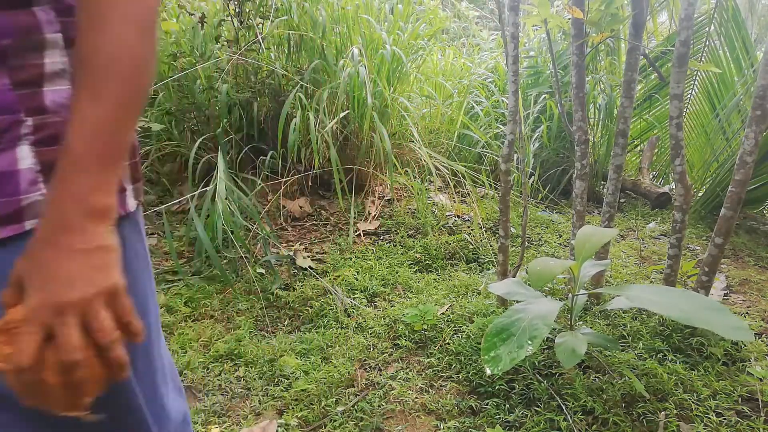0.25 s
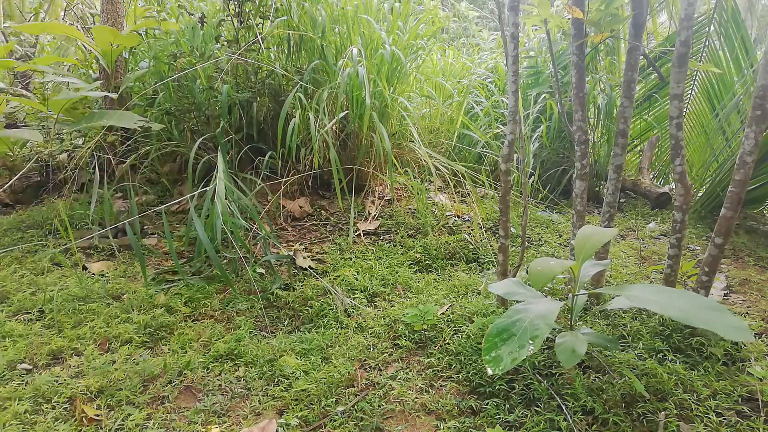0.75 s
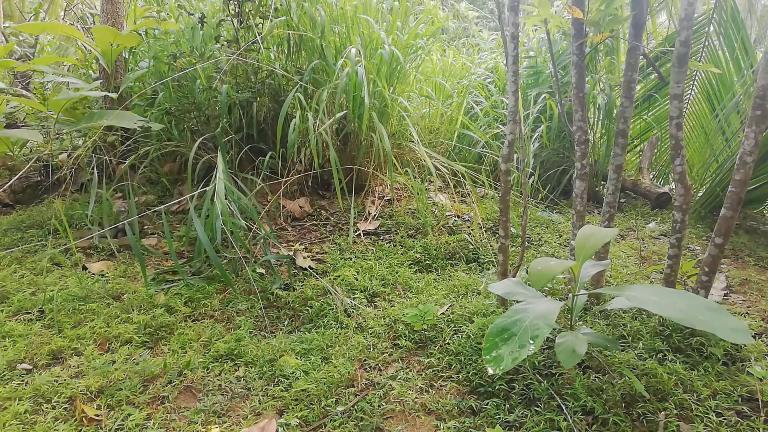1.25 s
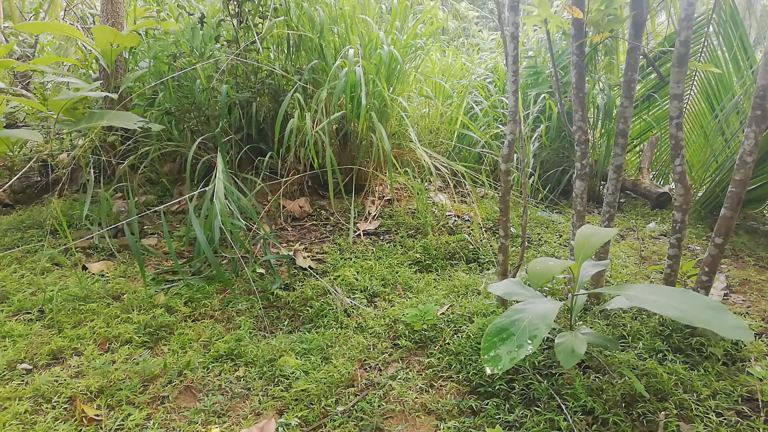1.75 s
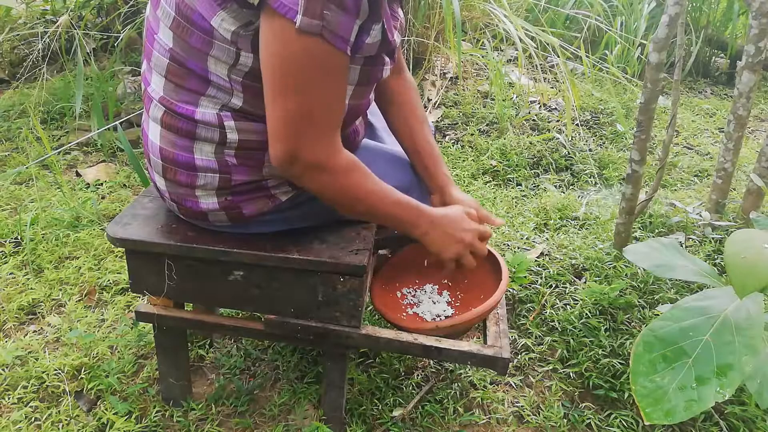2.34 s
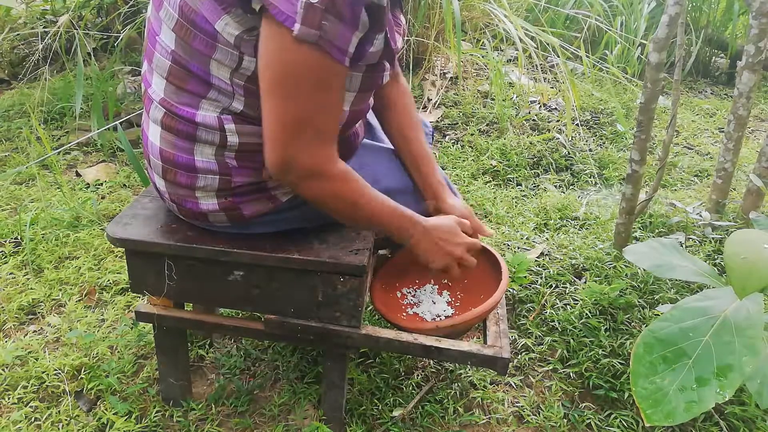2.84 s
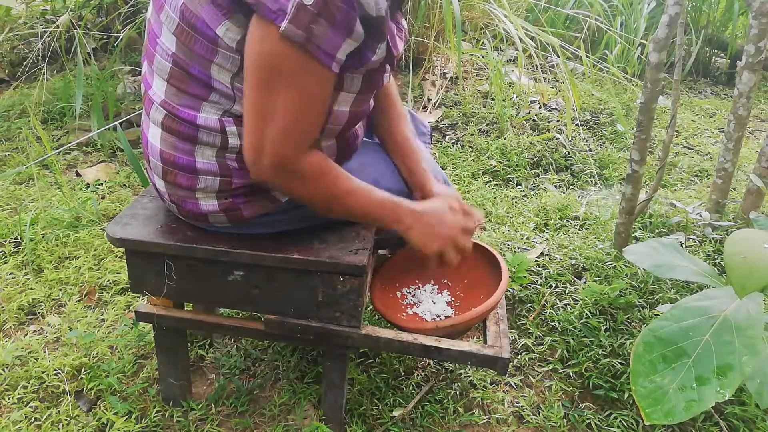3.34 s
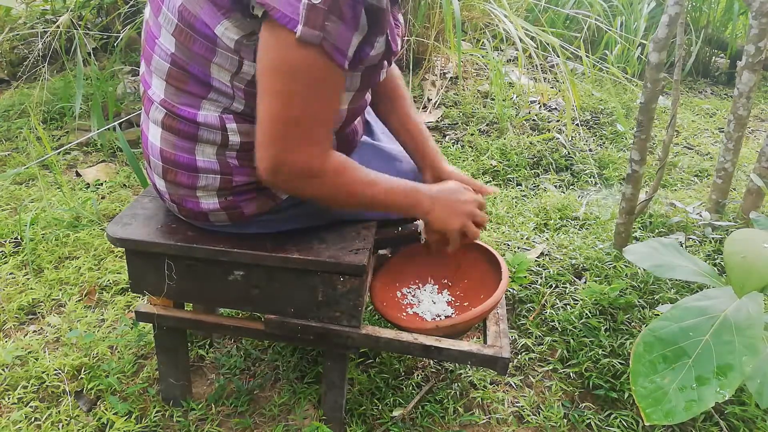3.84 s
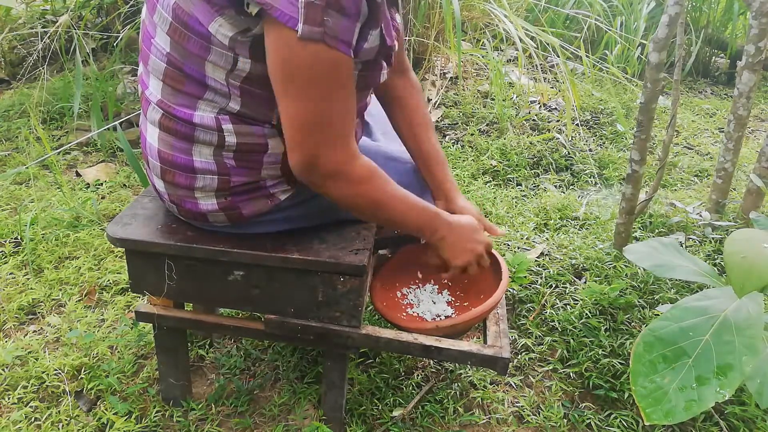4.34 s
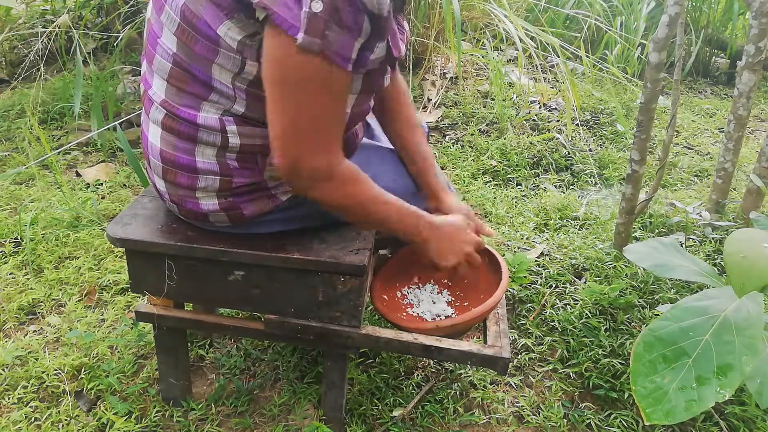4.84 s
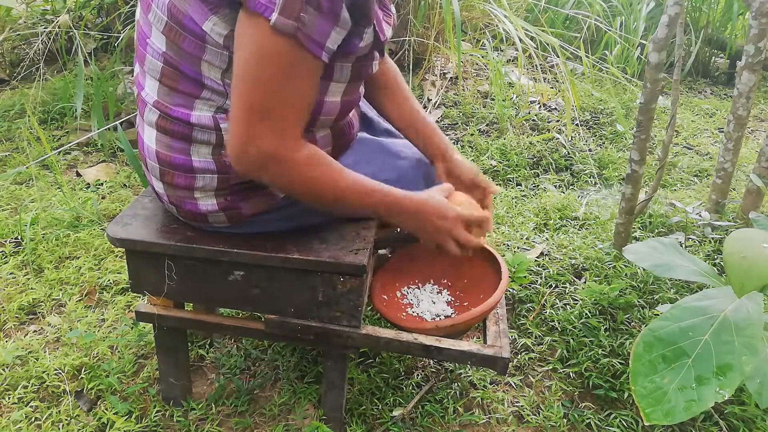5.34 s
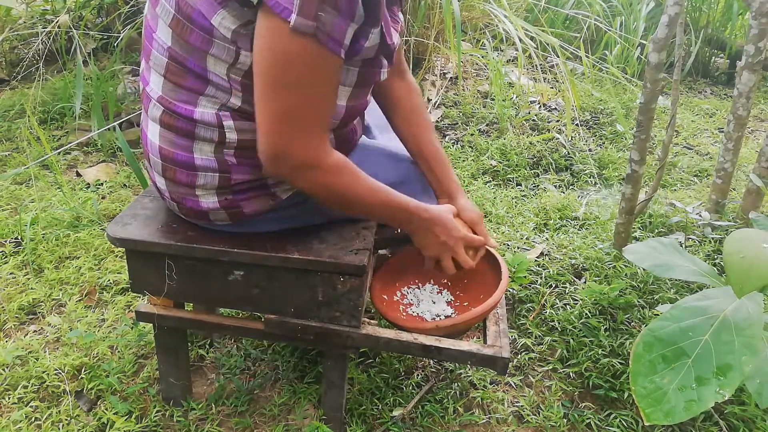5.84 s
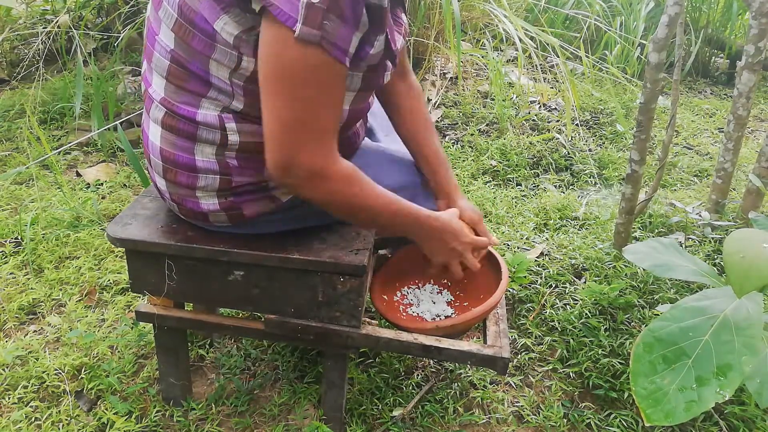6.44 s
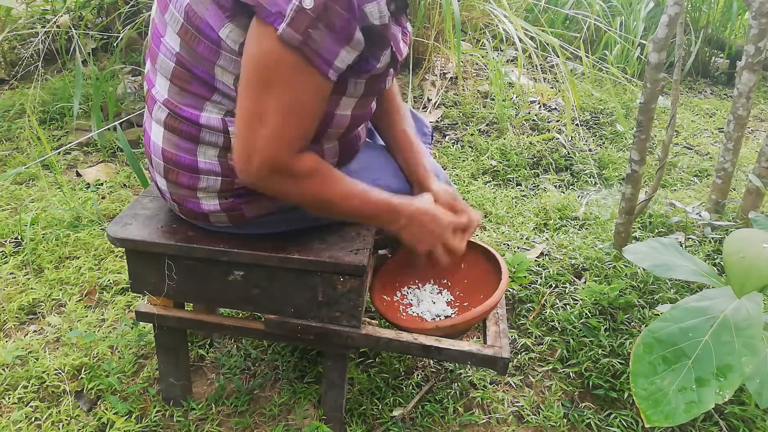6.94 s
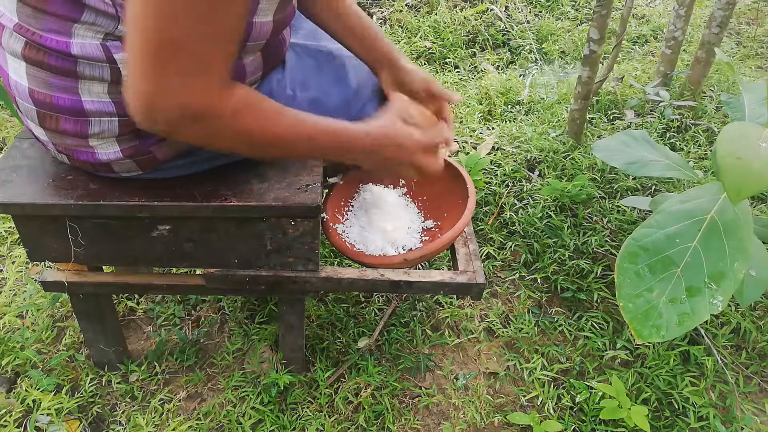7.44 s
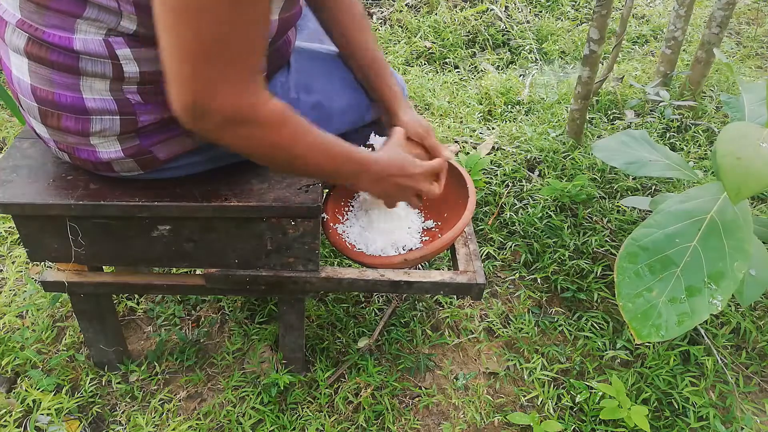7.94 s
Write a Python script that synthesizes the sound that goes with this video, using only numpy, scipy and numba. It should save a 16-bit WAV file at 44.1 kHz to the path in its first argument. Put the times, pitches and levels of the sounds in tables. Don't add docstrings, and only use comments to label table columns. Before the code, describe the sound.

From 0 to 2 s a quiet garden: low far traffic hum, thin leaf hiss, and small crisp grass rustles, a sharp step at the start and another near 0.9 s, a slower one at 1.2 s. A tiny silence at 1.97 s, then the work begins. From 2.2 to 4.9 s a coconut half is scraped on a toothed blade in rough, fibrous rasps every 0.3 s, each joined by a hollow wooden knock and brief stool groan, knocks growing harder towards 4.8 s. A pause with light shell taps follows; at 5.5 s strokes resume, with scratchy catches, softer knocks at first, strong again by 6.4-7.0 s. Another pause, a cut near 7.4 s, then three softer, hissier strokes at 7.6, 7.9 and 8.2 s, the last with a loud clack. Faint thin bird whistles pass throughout the work. Dry outdoor stereo, about two metres away.

```python
import sys
import numpy as np
from scipy import signal
from scipy.fft import rfft, irfft
from scipy.io import wavfile
from scipy.ndimage import uniform_filter1d
from numba import njit

SR = 44100
rng = np.random.default_rng(int(sys.argv[2]) if len(sys.argv) > 2 else 0)


def generate_wav(sig):
    pcm = np.round(np.clip(np.atleast_2d(sig).T, -1, 1) * 32767).astype(np.int16)
    wavfile.write(sys.argv[1], SR, pcm)


def elevation(decibels):
    levels = np.asarray(decibels, float)
    return 10 ** (levels / 20)


N = 361619
T = np.arange(N) / SR


def level(x, db):
    return x * elevation(db) / np.sqrt(np.mean(x ** 2))


def over_hz(table):
    hz, value = np.transpose(table)
    bins_hz = np.arange(N // 2 + 1) * SR / N
    return np.interp(np.log(bins_hz + 1), np.log(hz), value)


def colour(x, table):
    return irfft(rfft(x) * elevation(over_hz(table)), N)


def filtered(x, order, hz, kind):
    return signal.sosfilt(signal.butter(order, hz, kind, fs=SR, output="sos"), x)


@njit
def ring(x, pole):
    y, z = np.empty(len(x)), 0j
    for i in range(len(x)):
        z = z * pole + x[i]
        y[i] = z.imag
    return y


def body(x, modes):
    out = np.zeros(N)
    for hz, db, t60 in modes:
        pole = np.exp((2j * np.pi * hz - np.log(1000) / t60) / SR)
        out += elevation(db) * ring(x + 1e-18, pole)
    return out


def walk(rate):
    k = int(SR / rate)
    held = np.repeat(rng.standard_normal(N // k + 1), k)
    return 0.96 * uniform_filter1d(held, k)[:N]


def blows(times, db, contact_s):
    x = np.zeros(N)
    x[np.minimum((np.asarray(times) * SR).astype(int), N - 1)] = elevation(db)
    push = np.hanning(int(contact_s * SR) + 3)
    return np.convolve(x, push / push.sum())[:N]


def snaps(per_s, spread_db):
    broken = rng.random(N) < per_s / SR
    strength = rng.standard_normal(N) * elevation(spread_db * rng.exponential(size=N))
    return level(broken * strength, 0)


def ports(a, b, like, pan, lead=0):
    c = np.clip(over_hz(like), -1, 1)
    common = np.sqrt((1 + c) / 2) * rfft(a)
    other = np.sqrt((1 - c) / 2) * rfft(b)
    tilt = elevation(over_hz(pan) / 2) * np.exp(.5j * lead)
    return np.array([irfft((common + other) * tilt, N), irfft((common - other) / tilt, N)])


# t/s, level/dB, swell/s, fade/s
RUSTLE = [
    (0.025, -55, 0.0043, 0.0099),
    (.25, -68, .06, .06),
    (.6, -66, .06, .02),
    (.864, -68, .02, .03),
    (.93, -51, .004, 0.019),
    (1.136, -64, .005, .015),
    (1.21, -59.5, .03, 0.045),
    (1.41, -72, .05, .02),
]


def rustling():
    out = np.zeros(N)
    for s, db, swell, fade in RUSTLE:
        out += elevation(db) * np.exp((T - s).clip(None, 0) / swell - (T - s).clip(0) / fade)
    return out


# f/Hz, level/dB per Hz
GARDEN = [(12, -24), (20, -3.5), (53, 1), (88, 2), (158, -6.5), (241, -19), (270, -20), (923, -17.5),
          (1120, -19), (2140, -22), (2820, -23.5), (3530, -23.5), (8410, -29), (16000, -41)]
# t/s, leaf hiss level/dB, traffic hum level/dB
AIR = [
    (0, -65.5, -55),
    (1.2, -66.5, -54.5),
    (1.97, -66.5, -56.5),
    (2.0, -64.5, -54.5),
    (3.8, -62.5, -50.5),
    (5.4, -62, -53),
    (7.3, -63, -53.5),
    (7.4, -67, -51.5),
    (8.2, -66, -49.5),
]
# f/Hz, likeness
FAR_LIKE = [(60, 0.98), (130, 1), (290, 0.74), (640, -0.67), (1410, 0.00036), (3100, -0.012), (6820, -0.2),
            (15000, 0.27)]
# f/Hz, left minus right level/dB
FAR_PAN = [(300, 0), (700, 1.5), (1290, -.5), (2380, 0), (4400, 2), (8120, 3.5), (15000, -2)]


def garden():
    s, hiss_db, hum_db = np.transpose(AIR)
    rustle = rustling()
    pair = []
    for _ in range(2):
        air = colour(rng.standard_normal(N), GARDEN)
        hum = level(filtered(air, 3, 220, "low"), 0)
        hum = hum * elevation(np.interp(T, s, hum_db) - 4.5 + 3.5 * walk(3.89))
        hiss = level(filtered(air, 3, 220, "high"), 0)
        hiss = hiss * elevation(np.interp(T, s, hiss_db) + 7.5 + 0.42 * walk(20))
        blades = colour(snaps(3000, 1.9), [(2000, -2), (5000, 1), (8500, 8), (12000, -1), (15500, -4)])
        pair.append(hum + hiss + rustle * level(blades, 1.0))
    return ports(*pair, FAR_LIKE, FAR_PAN)


# bite t/s, rise/s, push/s, tearing level/dB, spray of shreds relative level/dB
STROKES = [(2.261, .091, 0.059, -41, -7), (2.532, .056, 0.063, -39, -6), (2.826, 0.085, 0.053, -40, -6),
           (3.093, 0.053, 0.066, -40, -6.5), (3.378, 0.063, 0.052, -39, -6),
           (3.651, 0.048, 0.087, -40, -6.5), (3.95, 0.051, 0.057, -38.5, -6), (4.24, 0.044, 0.06, -38, -8),
           (4.517, 0.037, 0.081, -41, -7), (4.797, 0.036, 0.087, -40, -7.5), (5.505, 0.11, .065, -40, -8),
           (5.811, 0.086, 0.034, -37.5, -6.5), (6.073, 0.038, 0.074, -39.5, -6.5),
           (6.375, .047, 0.069, -40, -6.5), (6.658, 0.029, 0.083, -38.5, -8),
           (6.978, 0.043, 0.092, -39.5, -8), (7.565, 0.069, 0.085, -43.5, -3),
           (7.859, 0.048, 0.086, -43, -2), (8.181, .081, .1, -42, -3.5)]
# t/s, level/dB, fade/dB per s
GROANS = [(2.24, -43, 30), (2.522, -41, 62), (2.8, -39.5, 58), (3.08, -39, 100), (3.36, -37, 100),
          (3.64, -34, 152), (3.931, -30.5, 200), (4.228, -42.5, 92), (4.503, -30.5, 220),
          (4.786, -29.5, 207), (5.49, -38, 30), (5.765, -42, 32), (6.079, -36.5, 120), (6.361, -34.5, 148),
          (6.651, -36, 150), (6.964, -33, 150), (7.565, -41.5, 50), (7.843, -41.5, 36), (8.158, -36.5, 30)]


def strokes():
    bite, rise, push, db, spray_db = np.transpose(STROKES)[:, :, None]
    load_s, load_db, fade = np.transpose(GROANS)[:, :, None]
    coarse = T[::32]
    t, loaded = coarse - bite, coarse - load_s
    lifted = (t - push).clip(0)
    rise_db, sag_db_per_s, lift_db_per_s = 25, 37, 328
    tear_db = db + 2 + rise_db * t.clip(None, 0) / rise
    tear = elevation(tear_db - sag_db_per_s * t.clip(0, push) - lift_db_per_s * lifted)
    onset_db_per_s, release_db_per_s = 950, 260
    load_db = load_db + onset_db_per_s * loaded.clip(None, 0) - fade * loaded.clip(0)
    load = elevation(load_db - release_db_per_s * lifted)
    groan = np.hypot(load, elevation(-14.5) * tear)
    return [np.interp(T, coarse, v.sum(axis=0)) for v in (tear, groan, tear * elevation(spray_db))]


# f/Hz, level/dB per Hz
TEAR = [(290, -35), (500, -4), (621, -23.5), (1190, -10.5), (1740, -10), (1930, -10), (2160, -10.5),
        (2390, -9), (4940, -10.5), (10800, -20.5), (16000, -26.5)]
# f/Hz, bandwidth/Hz, level/dB
BLADE = [(940, 90, 0), (1200, 70, -2), (1960, 100, -2), (2350, 150, -4), (3010, 120, -5), (3620, 180, -4),
         (4750, 220, -7), (5200, 150, -10), (6200, 250, -11)]
# f/Hz, level/dB, t60/s
STOOL = [(262, 0, .065), (200, -10, .06), (325, -4, .05), (405, -3, .055), (490, -2, .045), (585, -5, .04),
         (690, -9, .035)]
# f/Hz, level/dB, t60/s
TEETH = [(9260, -5, 0.016), (11320, 1, 0.0049), (12600, 8, 0.0024)]


def tearing(tear, groan, spray, judder, grips, patch_hz):
    force = snaps(11000, 0.69) * judder
    flesh = colour(force, TEAR)
    shell, blade, stool, teeth = np.zeros((4, N))
    for hz, g in zip(patch_hz, grips):
        shell += g * body(flesh, [(hz, 10 * np.log10(hz), 45 / (hz + 900))])
    for (hz, width, db), g in zip(BLADE, grips[::3]):
        blade += g ** .7 * body(force, [(hz, db + 10 * np.log10(width), 2.2 / width)])
    for mode, g in zip(STOOL, grips[1::3]):
        stool += g ** .5 * body(force, [mode])
    shreds = filtered(flesh, 4, 6800, "high")
    for mode, g in zip(TEETH, grips[2::3]):
        teeth += g ** 0.59 * body(shreds, [mode])
    rasp = level(shell, -1.5) + level(flesh - shreds, -13) + level(blade, -5)
    hiss = level(shreds * grips[5] ** .3, -1) + level(teeth, -13)
    return tear * level(rasp, 1.0) + groan * level(stool, 0.17) + spray * level(hiss, 0.054)


# t/s, crack level/dB, ring relative level/dB, ring f/Hz, thud relative level/dB
TAPS = [(2.7678, -37.5, 14, 730, -12), (3.69, -32, -13, 950, -7), (3.8886, -41, 0, 1480, 0),
        (4.1733, -48, 4, 1360, 8), (4.4598, -44.5, 4, 1320, -6), (4.745, -48, 2, 1300, 13),
        (5.0824, -41.5, 7, 1180, 16.5), (5.2312, -42, -10, 790, 14.5), (5.2432, -52, 8, 1510, 2),
        (5.4273, -33.5, 19.5, 1190, 11), (5.7094, -47, 6, 930, 12), (6.309, -49.5, 4, 1200, 10),
        (6.364, -32, 2, 885, -8), (6.611, -48, 3, 1100, 6), (6.9646, -40, -14, 953, 7),
        (7.8504, -42, 11, 1180, 9), (7.9125, -34.5, 1, 910, 10), (8.099, -48, -18.5, 880, 12)]
# t/s, crack level/dB, shell ring relative level/dB, ring f/Hz
CATCHES = [(2.211, -43, 2, 1330), (2.5016, -41.5, 6, 750), (2.5314, -49, 7, 1190), (3.389, -32, 5, 960),
           (4.215, -34, -5, 900), (4.2952, -35, 5, 1460), (4.572, -31, 1, 1210), (4.8683, -41, 12, 1400),
           (5.476, -41.5, 14, 790), (5.504, -29, 1, 1180), (5.5672, -32.5, 7, 1210), (5.787, -30, 3, 1220),
           (5.829, -26.5, -19, 1170), (7.266, -61.5, 19, 1430), (7.5032, -42, -4, 1190),
           (7.549, -42, 4, 1180), (7.6096, -35, 6, 910)]
# multiple of ring f, level/dB, t60/s
SHELL = [(1, 0, .02), (1.22, -2, .018), (.68, -2, .022), (1.6, -8, .012)]


def taps(noise):
    catch_thud_db = 0
    events = [*TAPS, *[(*row, catch_thud_db) for row in CATCHES]]
    s, db, ring_db, ring_hz, thud_db = np.transpose(events)
    crack_decay_s = 0.0042
    fade = signal.lfilter([1], [1, -np.exp(-1 / (crack_decay_s * SR))], blows(s, db + 0.5, 0.0043))
    thud_modes = [(hz, d, 1.6 * t60) for hz, d, t60 in STOOL if hz > 220]
    wood = body(blows(s, db + thud_db - 14.5, .0016), thud_modes)
    t = T[:3000]
    for start, peak_db, hz in zip((s * SR).astype(int), db + ring_db - 2.0, ring_hz):
        shell = sum(elevation(peak_db + d - 60 * t / t60) * np.sin(2 * np.pi * k * hz * t) for k, d, t60 in SHELL)
        wood[start:start + 3000] += (shell * (1 - np.exp(-t / 0.00093)))[:N - start]
    return fade * noise, wood


# t/s, peak level/dB, upper mode relative level/dB
KNOCKS = [(2.28, -17, -11), (2.563, -17, -13), (2.843, -11.5, -7.5), (3.104, -14.5, -21),
          (3.383, -14.5, -17), (3.656, -9, -9), (3.68, -18, -24), (3.943, -7.5, -10), (4.231, -15.5, -10.5),
          (4.514, -6.5, -10), (4.796, -6.5, -11), (5.532, -22, -7), (5.551, -20, -10), (5.816, -18.5, -21),
          (6.089, -11.5, -13), (6.389, -7, -7.5), (6.677, -8, -11), (6.989, -4.5, -9.5),
          (7.605, -22.5, -25), (7.623, -17.5, -26), (8.177, -8.5, -11)]
# f/Hz, level/dB, t60/s
ARM = [(1190, -4, 0.025), (870, -12, 0.014), (2430, -6, 0.089), (1502, -15.5, 0.051), (1970, -11.5, 0.053)]


def knocks():
    s, db, upper_db = np.transpose(KNOCKS)
    chance = rng.standard_normal((8, len(s)))
    arm_hz, arm_t60_s, rebound_s = 965, .055, .0068
    struck = blows(s, db - 4.0, 0.00068)
    caught = blows(s + 3 / arm_hz, db - 6.5 + chance[5], .0006)
    rebound = blows(s + rebound_s + .001 * chance[6], db - 17 + 2.8 * chance[7], 0.00074)
    arm = body(struck - caught + rebound, [(arm_hz, 0, arm_t60_s)])
    side = np.zeros(N)
    for k, (mode, c) in enumerate(zip(ARM, chance)):
        side += body(blows(s, db + upper_db + k * .6 * c, 0.00059), [mode])
    return arm - side + body(blows(s, db - 32.5, 0.00047), STOOL)


# f/Hz, likeness
NEAR_LIKE = [(100, 1.0), (200, .97), (350, .9), (640, .93), (1200, .93), (2200, .62), (3500, .5),
             (6800, .25), (15000, .05)]
# f/Hz, left minus right level/dB
NEAR_PAN = [(100, 0), (250, -.5), (400, 1), (700, 8.5), (1290, 1), (2380, 0), (4400, -1), (8120, 3),
            (11000, -5), (13000, -11), (15000, -9)]
# f/Hz, left lead/rad
NEAR_LEAD = [(60, 0), (250, 0.5), (600, 0.66), (1200, 0.42), (3270, 0.33), (8790, -2), (11000, 1.5)]


def grating():
    tear, groan, spray = strokes()
    judder = elevation(1.2 * walk(120) + 2 * walk(35))
    grips = [elevation(4.5 * walk(9) + 4.5 * walk(55)) for _ in range(34)]
    patch_hz = 650 * 2 ** ((np.arange(34) + .6 * rng.random(34)) / 10)
    a, b = [tearing(tear, groan, spray, judder, grips, patch_hz) for _ in range(2)]
    crack_a, wood = taps(level(colour(rng.standard_normal(N), TEAR), 0))
    crack_b, _ = taps(level(colour(rng.standard_normal(N), TEAR), 0))
    wood = wood + knocks()
    ground = 0.13 * np.roll(wood, 130)
    pair = ports(a + crack_a + wood, b + crack_b + ground, NEAR_LIKE, NEAR_PAN, over_hz(NEAR_LEAD))
    pair = pair * elevation(np.outer([.5, -.5], 1 * (T > 7.36)))
    return filtered(pair, 3, 180, "high")


# start t/s, length/s, start f/Hz, end f/Hz, level/dB
BIRDS = [(2.4, .1, 4600, 4470, -59), (2.66, .1, 4600, 4500, -69), (2.933, .11, 4700, 4550, -63),
         (3.194, 0.17, 4750, 4450, -56), (4.014, .06, 3070, 3150, -48), (5.322, .033, 3400, 3330, -61),
         (7.38, .09, 4100, 3920, -65), (7.47, .035, 5800, 5720, -55), (7.507, .04, 5630, 5680, -55),
         (7.76, 0.062, 3600, 3520, -58), (8.02, .089, 3620, 3520, -68)]


def birds():
    out, waver_hz = np.zeros(N), 89.2 * walk(300)
    for start, length, hz0, hz1, db in BIRDS:
        u = np.clip((T - start) / length, 0, 1)
        swell = np.sqrt(np.sin(np.pi * u).clip(0))
        phase = 2 * np.pi * np.cumsum(hz0 + (hz1 - hz0) * u + waver_hz) / SR
        out += elevation(db) * swell * np.sin(phase)
    return np.array([out, 0.67 * np.roll(out, 3)])


def scene():
    return garden() + grating() + birds()


def roll_off(x):
    return signal.sosfilt(signal.butter(12, 16290, fs=SR, output="sos"), x)


SPLICE_S = (1.9695, 1.9838)


def record(dry):
    dull = signal.sosfilt(signal.ellip(10, .2, 80, 15600, fs=SR, output="sos"), dry)
    heard = (T < SPLICE_S[0]) | (T > SPLICE_S[1])
    return roll_off(dull * heard)


dry = scene()
out = record(dry)
generate_wav(out)
```